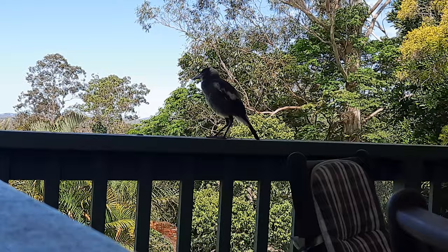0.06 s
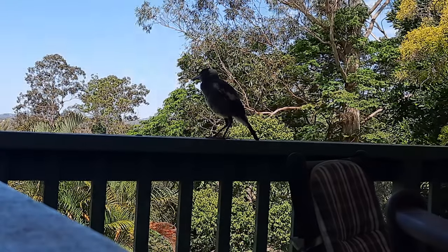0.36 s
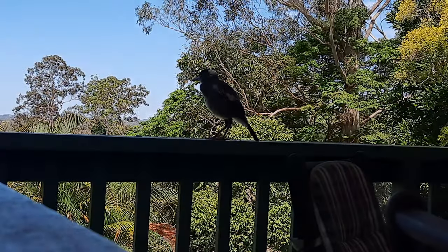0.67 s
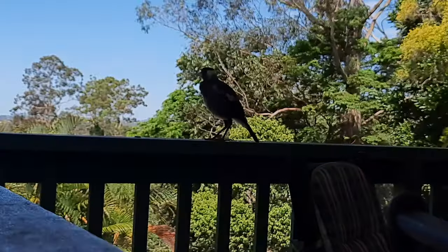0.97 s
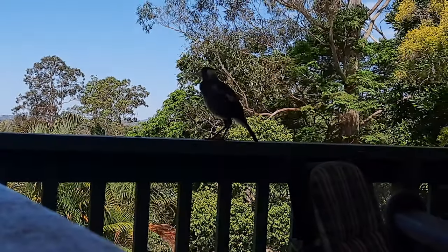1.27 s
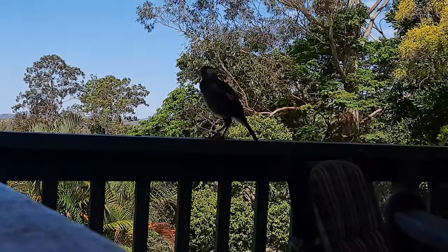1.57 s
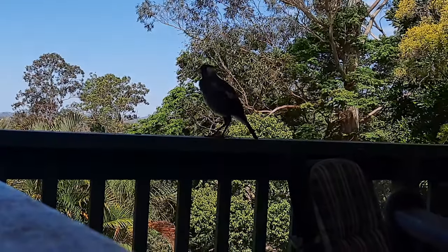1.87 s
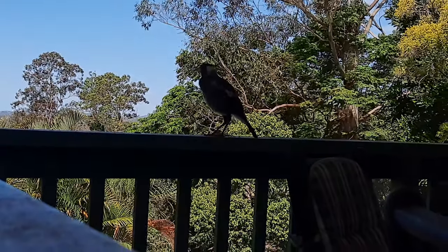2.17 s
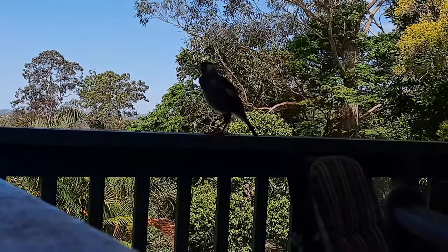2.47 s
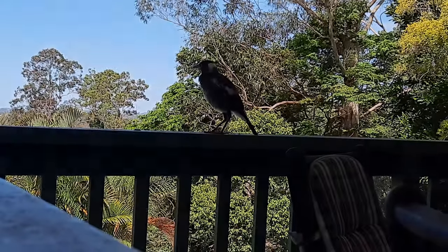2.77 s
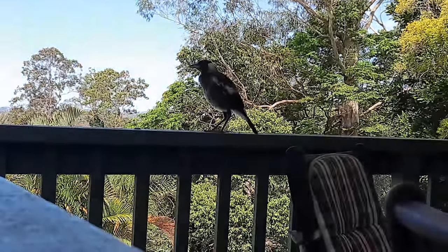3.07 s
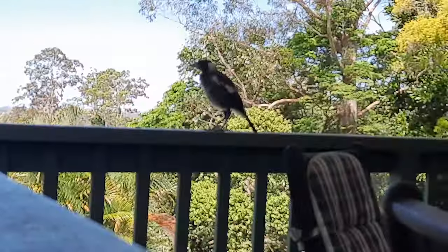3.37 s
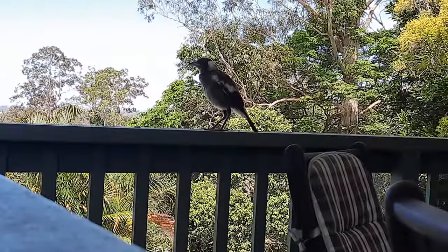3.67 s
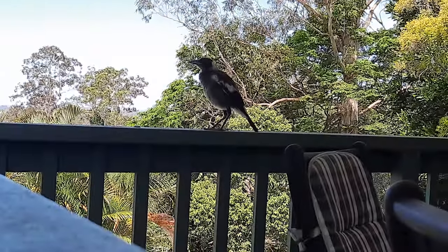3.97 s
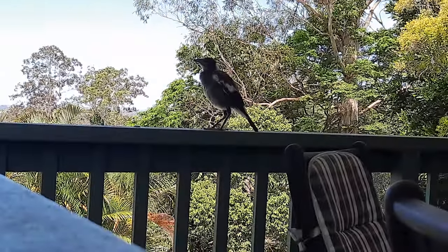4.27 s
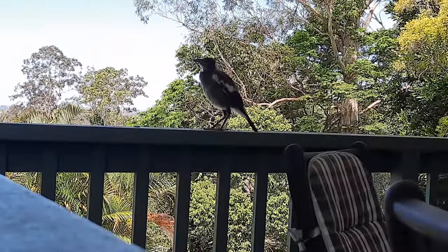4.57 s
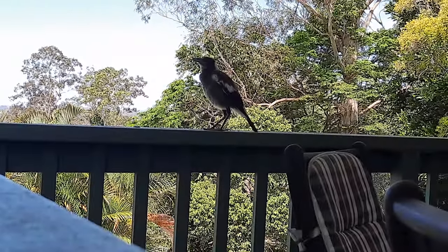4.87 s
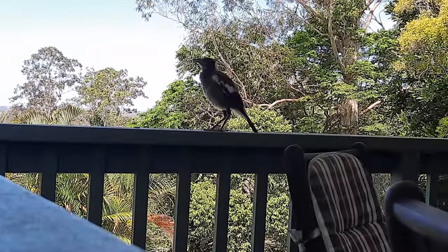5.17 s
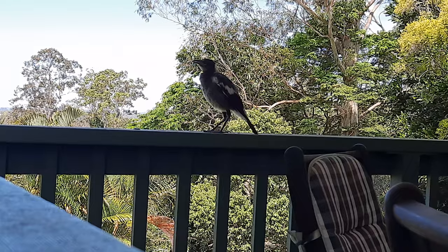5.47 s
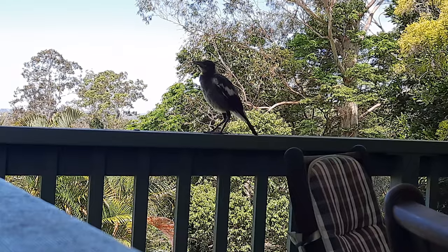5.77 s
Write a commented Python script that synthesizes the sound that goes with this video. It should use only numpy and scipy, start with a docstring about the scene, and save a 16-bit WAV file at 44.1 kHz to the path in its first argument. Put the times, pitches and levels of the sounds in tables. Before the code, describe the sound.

A young magpie warbles softly nearby in short, irregular phrases, over steadily shrilling cicadas and a hum of distant traffic.

```python
"""A suburban verandah. On the rail a young magpie warbles softly: its syrinx membranes give gliding,
often rough whistles and low throbs, then slap shut in a closing rasp. Deck, wall and roof reflect it.
Cicadas shrill in the trees, a smaller bird pipes further off, faint whistles echo from deep in the foliage.
A light breeze puffs at the left microphone port over the hum of distant traffic."""
import sys
import numpy as np
from scipy import signal
from scipy.fft import rfft, irfft
from scipy.io import wavfile

SR = 44100
rng = np.random.default_rng(int(sys.argv[2]) if len(sys.argv) > 2 else 0)


def to_wav(s):
    """Save 16-bit WAV."""
    ch = np.atleast_2d(s).T  # columns
    pcm = np.round(np.clip(ch, -1, 1) * 32767)  # PCM
    wavfile.write(sys.argv[1], SR, pcm.astype(np.int16))


N = 265041
T = np.arange(N) / SR

SMOOTH, CLEAR, HUSKY, HOARSE = .04, .13, .42, .85  # roughness 0-1: unsteadiness of the membranes
PURE = -29.5  # octave overtone/dB of a note sung without pressure


def undb(db):
    """Decibels to gain."""
    return 10 ** (np.asarray(db) / 20)


def unit(x):
    """Scale to rms 1."""
    return x / np.sqrt(np.mean(x ** 2))


def over_time(rows):
    """Interpolate each column over time."""
    times_s, *columns = np.transpose(rows)
    return [np.interp(T, np.sort(times_s), c) for c in columns]


def over_frequency(rows):
    """Interpolate each column over log frequency."""
    hz, *columns = np.transpose(rows)
    bins_hz = np.maximum(np.fft.rfftfreq(N, 1 / SR), 1)
    return [np.interp(np.log(bins_hz), np.log(hz), c) for c in columns]


def gate(from_s, to_s, fade_s):
    """Unity over the span, fading outside it."""
    edge = np.clip(np.minimum(T - from_s, to_s - T) / fade_s + 1, 0, 1)
    return np.sin(np.pi / 2 * edge) ** 2


def wander(rate_hz):
    """Smooth random signal, rms 1, rolling off at rate_hz."""
    lowpass = np.exp(-(np.fft.rfftfreq(N, 1 / SR) / rate_hz) ** 2)
    return unit(irfft(rfft(rng.standard_normal(N)) * lowpass, N))


def band(x, lo_hz, hi_hz, order=2):
    """Butterworth band-pass."""
    return signal.sosfilt(signal.butter(order, [lo_hz, hi_hz], "band", fs=SR, output="sos"), x)


def colour(x, spectrum):
    """Filter by rows of f/Hz, gain/dB; flat beyond the ends."""
    response = np.fft.fftshift(irfft(undb(over_frequency(spectrum)[0]), N))
    return signal.fftconvolve(x, response, mode="same")


def phase_rad(hz):
    """Oscillator phase along a pitch curve."""
    return 2 * np.pi * np.cumsum(hz) / SR


def pan(x, left_db):
    """Stereo, left_db louder on the left."""
    return x * undb(np.array([[left_db], [-left_db]]) / 2)


def reverb(x, t60_s, gap_s):
    """Diffuse tail of unit energy, independent per channel."""
    t = T[:SR]
    tail = rng.standard_normal((2, SR)) * np.exp(-np.log(1000) * t / t60_s) * (t > gap_s)
    tail /= np.sqrt(np.sum(tail ** 2, axis=1, keepdims=True))
    return signal.fftconvolve(x[None], tail, axes=1)[:, :N]


def surround(spectrum):
    """Noise from all around at the two microphone ports; mid rms 1."""
    # port pair: f/Hz, coherence 0-1, left minus right/dB
    ports = [(61, 1, 8.5), (152, 0.84, -1), (390, 0.5, 7.5), (700, 0.43, 4), (1401, 0, 1), (2260, 0.2, 4.5),
             (4610, 0, -.5), (7980, 0.12, -4), (10080, 0, 12), (12800, 0, 1.5)]
    coherence, left_db = over_frequency(ports)
    sign = np.array([[1], [-1]])
    mid, side = rfft(rng.standard_normal((2, N)))
    pair = np.sqrt(1 + coherence) * mid + sign * np.sqrt(1 - coherence) * side
    noise = irfft(pair * undb(over_frequency(spectrum)[0] + sign * left_db / 2), N)
    return noise / np.std(noise.mean(axis=0))


def whistles(notes, attack_s, release_s):
    """Syrinx notes bend through three pitches and swell midway; roughness shakes pitch and level."""
    swell_db = 3.5
    jitter, flutter_db, gravel = .055, 4.2, .45  # rms at roughness 1
    shake, flutter, grit = wander(202), wander(195), wander(630)
    voice = np.zeros(N)
    for start_s, length_s, open_hz, mid_hz, close_hz, db, rough, octave_db in notes:
        span = slice(max(0, int((start_s - attack_s) * SR)), int((start_s + length_s + release_s) * SR))
        t = T[span] - start_s
        along = np.clip(2 * t / length_s - 1, -1, 1)
        hz = mid_hz + (close_hz - open_hz) / 2 * along + ((open_hz + close_hz) / 2 - mid_hz) * along ** 2
        phase = phase_rad(hz * (1 + jitter * rough * shake[span]))
        tone = np.sin(phase) + undb(octave_db) * np.sin(2 * phase)
        tone *= 1 + gravel * rough * grit[span]
        edge = np.clip(np.minimum(t / attack_s, (length_s - t) / release_s) + .5, 0, 1)
        level_db = db - swell_db * along ** 2 + flutter_db * rough * flutter[span]
        voice[span] += np.sqrt(2) * np.sin(np.pi / 2 * edge) ** 2 * undb(level_db) * tone
    return voice


def buzz(contour, jitter, lo_hz, hi_hz, harmonics):
    """The membranes slap shut once a cycle; the throat passes one band of overtones."""
    hz, db = over_time(contour)
    phase = phase_rad(hz * (1 + jitter * wander(249)))
    pulses = sum(np.cos(k * phase) for k in range(1, harmonics + 1))
    envelope = undb(db) * gate(contour[0][0], contour[-1][0], fade_s=.008)
    return envelope * unit(band(pulses, lo_hz, hi_hz))


def magpie():
    """Gliding whistles and low throbs, both shaped by the throat."""
    # warble; at overlaps both sides of the syrinx sound:
    # t/s, length/s, opening f/Hz, middle f/Hz, closing f/Hz, relative level/dB, roughness 0-1, octave/dB
    notes = [ (0, 0.031, 1248, 1081, 1050, -32.5, HUSKY, PURE),
             (.005, 0.089, 1268, 1405, 1077, -39, HOARSE, PURE),
             (.085, .07, 1122, 1079, 1040, -45, HUSKY, PURE),
             (.228, 0.024, 1660, 1560, 1420, -47, HUSKY, PURE),
             (.25, 0.032, 1387, 1292, 1160, -36.5, HUSKY, PURE),
             (.295, 0.038, 902, 862, 775, -47, HUSKY, PURE),
             (.405, 0.019, 1316, 1310, 1330, -46, CLEAR, PURE),
             (1.038, 0.072, 1192, 1345, 1350, -41.5, CLEAR, PURE),
             (1.11, 0.022, 1310, 1379, 1346, -31.5, CLEAR, -18),
             (1.138, 0.038, 1630, 1570, 1270, -40.5, HUSKY, PURE),
             (1.225, .05, 1230, 1348, 1396, -31, CLEAR, PURE),
             (1.248, 0.033, 1626, 1548, 1580, -38.5, HUSKY, PURE),
             (1.277, 0.045, 1210, 1254, 1010, -33.5, CLEAR, PURE),
             (1.323, 0.021, 1372, 1365, 1230, -28, CLEAR, PURE),
             (1.342, 0.022, 1200, 1090, 1096, -26, CLEAR, PURE),
             (1.37, .075, 1178, 1137, 1188, -33.5, CLEAR, PURE),
             (1.445, 0.055, 1238, 1353, 1236, -42, HOARSE, PURE),
             (1.448, 0.025, 1560, 1605, 1690, -35, CLEAR, PURE),
             (1.725, 0.067, 1143, 1633, 1320, -46.5, HOARSE, -18),
             (1.815, 0.042, 1296, 1474, 1680, -38, HUSKY, PURE),
             (1.853, 0.042, 1575, 1676, 1020, -34, HUSKY, PURE),
             (1.895, 0.052, 972, 1039, 1076, -40, HOARSE, PURE),
             (1.945, 0.03, 1300, 1534, 1560, -42, HOARSE, PURE),
             (1.99, 0.031, 1090, 1133, 1035, -39, HOARSE, -15),
             (2.0, 0.068, 1378, 1290, 1130, -49.5, HOARSE, PURE),
             (2.035, 0.07, 863, 828, 780, -42, HOARSE, PURE),
             (2.362, 0.032, 1473, 1276, 880, -45, HOARSE, PURE),
             (2.642, 0.038, 1396, 1283, 1250, -44, HOARSE, PURE),
             (2.785, 0.211, 931.5, 1020, 988, -45.5, HUSKY, PURE),
             (3.283, 0.068, 889, 945, 1044, -44, HUSKY, PURE),
             (3.378, 0.0513, 1105, 1087, 990, -40.5, CLEAR, -8),
             (3.437, 0.025, 1370, 1294, 1200, -41, HUSKY, PURE),
             (3.598, 0.027, 1453, 1074, 1040, -38, HUSKY, PURE),
             (3.62, .115, 758.5, 818, 789, -45, HOARSE, PURE),
             (3.66, 0.057, 1057, 1040, 980, -48.5, HOARSE, PURE),
             (4.615, 0.051, 1272, 1132, 1074, -44.5, HUSKY, -6.5),
             (4.807, 0.02, 1197, 1250, 1230, -45, HOARSE, PURE),
             (4.845, .055, 1334, 1192, 1370, -37, HUSKY, PURE),
             (4.903, .033, 1342, 1288, 1144, -33, HUSKY, PURE),
             (4.935, .145, 1203, 1064, 931, -43.5, HOARSE, PURE),
             (5.198, 0.044, 1421, 1352, 1300, -37, CLEAR, PURE),
             (5.24, 0.028, 1360, 1346, 1280, -30, CLEAR, PURE),
             (5.272, .036, 1230, 1172, 1020, -41, HUSKY, PURE),
             (5.399, 0.011, 1117, 1305, 1440, -33, HUSKY, PURE),
             (5.405, 0.043, 1540, 1573, 1696, -29.5, CLEAR, PURE),
             (5.444, 0.073, 1792, 1814, 1700, -44.5, HOARSE, PURE),
             (5.522, 0.023, 1395, 1263, 1170, -42.5, HUSKY, -4.5),
             (5.591, 0.033, 1430, 1301, 1340, -37.5, CLEAR, PURE),
             (5.627, 0.042, 1406, 1358, 1247, -31.5, CLEAR, PURE),
             (5.668, 0.057, 1187, 891, 843, -44.5, HOARSE, PURE),
             (5.745, 0.019, 1520, 1640, 1140, -37.5, HUSKY, PURE),
             (5.776, 0.048, 1016, 1052, 1034, -34.5, SMOOTH, -9.5),
             (5.848, 0.072, 1142, 1042, 980, -43, HUSKY, PURE),
             (5.925, 0.06, 855, 848, 815, -38.5, HUSKY, -9), ]
    # short voice pulses, single or in rolls: t/s, relative level/dB
    throbs = [(0.386, -34), (1.518, -40.5), (1.564, -42), (1.783, -30), (1.805, -34), (2.062, -36),
              (2.099, -31), (2.386, -37.5), (2.446, -40), (2.643, -30), (2.675, -41), (2.784, -34.5),
              (2.806, -38), (2.833, -27.5), (2.894, -27), (2.94, -30), (2.97, -27.5), (3.337, -38),
              (3.684, -34), (4.796, -30), (4.844, -31.5), (4.934, -26), (4.967, -31.5), (5.002, -34),
              (5.05, -31.5), (5.302, -39.5)]
    # throat and nearly closed beak: f/Hz, gain/dB
    throat = [(500, -5.5), (740, 4), (810, -1.5), (875, 1), (960, -1.5), (1050, -1.5), (1370, -0.5),
              (1480, -3), (1620, -2), (2150, 2), (2500, -3), (3200, -4)]
    throb_s, top_hz, low_hz = .015, 884.3, 822.7  # pitch arch at the lowest throat resonance
    arches = [(s, throb_s, low_hz, top_hz, low_hz, db - 3, HUSKY, PURE) for s, db in throbs]
    warble = whistles(notes, attack_s=.011, release_s=.01)
    throbbing = whistles(arches, attack_s=.028, release_s=.01)
    return undb(-.39) * colour(warble + throbbing, throat)


def nasal_note():
    """The magpie's thin opening buzz: high overtones of the membrane pulses."""
    # contour: t/s, f/Hz, relative level/dB
    contour = [(0, 932, -51), (.04, 965, -52), (.08, 974, -53), (.11, 920, -53), (.15, 900, -70)]
    return undb(-.5) * buzz(contour, jitter=.021, lo_hz=2600, hi_hz=4200, harmonics=7)


def verandah(x):
    """Direct sound, hard reflections, a short ring under the roof and a faint one from the garden."""
    # deck, wall and roof reflections: delay/s, left gain, right gain
    echoes = [(.004, 0.11, 0.1), (0.0126, 0.32, .05), (0.0158, .05, 0.22), (0.0211, 0.079, 0.11),
              (0.032, 0.075, 0.15)]
    early = sum(np.array([[left], [right]]) * np.interp(T - delay_s, T, x, left=0)
                for delay_s, left, right in echoes)
    roof = undb(-2.5) * reverb(x, t60_s=.25, gap_s=.005)
    garden = undb(-23) * reverb(x, t60_s=1.0, gap_s=.087)
    wet = early + roof + garden
    mid = wet.mean(axis=0)
    alike_hz = 1230  # below this the reflections narrow towards mono
    side_db = over_frequency([(alike_hz / 2, -20), (alike_hz, 0)])[0]
    side = irfft(rfft(wet - mid) * undb(side_db), N)
    return undb(-1.63) * pan(x + mid + side, left_db=4)


def cicadas():
    """Many insects merge into one shrill band that grows steadily and shimmers."""
    # chorus spectrum: f/Hz, relative density/dB
    chorus = [(5500, -29.5), (6700, -22.5), (7050, -16), (7350, -9.5), (7900, -1.5), (8350, 1.5),
              (8700, -2.2), (9050, -5.5), (9450, -8), (9750, -14.5), (10200, -21.5), (11000, -28.5),
              (14000, -51)]
    start_db, rise_db_per_s, shimmer_db = -46, 1.0, .39
    return surround(chorus) * undb(start_db + rise_db_per_s * T + shimmer_db * wander(90))


def suburb():
    """Distant traffic with a low drone, slowly growing, and a soft hiss from the trees."""
    # traffic spectrum: f/Hz, relative density/dB
    traffic = [(18, -53), (30, -14.5), (85, -2.5), (173, -3.5), (220, -10.5), (290, -1.5), (406, -1.5),
               (588, 0.5), (690, -3.5), (824, -1), (983, -5.5), (1100, -3.5), (1400, -23), (1820, -68),
               (3080, -120)]
    # leaves and far insects: f/Hz, relative density/dB
    leaves = [(600, -62), (1300, -1.5), (1900, -1), (2450, -1), (2900, -4), (3500, -8), (4300, -2.5),
              (5400, -7), (6500, -5), (9000, -13), (12500, -6.5), (14500, -14.5), (17000, -74)]
    start_db, rise_db_per_s = -54.5, .64
    hum = surround(traffic) * undb(.5 * wander(8.6))
    drone = undb(-10.5) * unit(band(rng.standard_normal(N), 283, 340.4))
    hiss = surround(leaves) * undb(-55.5 + .5 * wander(7.6))
    return (hum + pan(drone, left_db=-3)) * undb(start_db + rise_db_per_s * T) + hiss


def tree_bird():
    """A scratchy squeak clears into piping with a strong octave, scattered by foliage."""
    # call: t/s, length/s, opening f/Hz, middle f/Hz, closing f/Hz,
    # relative level/dB, roughness 0-1, octave/dB
    piping = [ (.584, 0.017, 2610, 2580, 2600, -47.5, HUSKY, -5),
              (.615, 0.039, 2310, 2356, 2390, -44, HUSKY, -7),
              (.654, 0.036, 1880, 2000, 2090, -44.5, HOARSE, -1),
              (.671, 0.031, 2640, 2622, 2630, -40.5, HUSKY, -6),
              (.712, 0.048, 2433, 2437, 2475, -40.5, SMOOTH, 2.5),
              (.756, 0.056, 2464, 2451, 2437, -33.5, SMOOTH, -15),
              (.826, 0.017, 2300, 2345, 2390, -41, SMOOTH, -31),
              (.858, 0.036, 2390, 2400, 2450, -49.5, SMOOTH, -17), ]
    call = whistles(piping, attack_s=.008, release_s=.026)
    right_lag_s = .00023  # the bird sits to the left
    direct = np.array([call, np.interp(T - right_lag_s, T, call)])
    scattered = reverb(call, t60_s=.13, gap_s=.0073)
    return pan(undb(-3.5) * direct + undb(-1) * scattered, left_db=1.5)


def far_whistles():
    """Wavering whistles so deep in the trees that only their echo arrives."""
    # whistles: t/s, length/s, f/Hz, relative level/dB
    notes = [(0.954, 0.51, 2396, -60.5), (1.506, 0.26, 2540, -60.5), (3.202, 0.49, 2380, -63)]
    waver = 1 + .045 * wander(60)
    calls = sum(undb(db) * gate(s, s + length_s, fade_s=.046) * np.sin(phase_rad(hz * waver))
                for s, length_s, hz, db in notes)
    return undb(7) * reverb(calls, t60_s=.34, gap_s=.03)


def breeze():
    """Eddies rumble at each port independently, most at the windward left: puffs, then a gusty spell."""
    # wind puffs: t/s, length/s, relative level/dB
    puffs = [(2.119, 0.12, -53), (3.18, .07, -49), (3.438, .057, -48.5), (3.623, .08, -46),
             (3.664, 0.08, -46), (3.75, .08, -51.5), (4.413, .11, -44), (4.563, .044, -47)]
    spell_db, gust_db, lee_db = -48.5, 4, -8.5
    eddies = band(rng.standard_normal((2, N)), 57, 76.6, order=1)
    eddies = unit(band(eddies, 33, 280, order=3))
    puffing = sum(undb(db + 4) * np.exp(-(2 * (T - s) / length_s) ** 2) for s, length_s, db in puffs)
    spell = gate(from_s=4.7, to_s=5.7, fade_s=.13) * undb(spell_db + gust_db * wander(11))
    return (puffing + spell) * undb([[0], [lee_db]]) * eddies


def rasp():
    """The magpie's closing rasp: slow, uneven membrane pulses."""
    # contour: t/s, pulse rate/Hz, level/dB
    contour = [(5.885, 284.4, -57), (5.925, 273, -56), (5.942, 269, -37.5), (5.97, 273.5, -43.5),
               (6.01, 295, -48)]
    return buzz(contour, jitter=.0343, lo_hz=1340, hi_hz=1960, harmonics=11)


def scene():
    """The magpie close by, the garden behind it."""
    near = verandah(rasp() + nasal_note() + magpie())
    return near + tree_bird() + far_whistles() + cicadas() + suburb() + breeze()


def record(dry):
    """The recorder's steep low-pass cuts the top."""
    top_hz = 14800
    return signal.sosfilt(signal.ellip(10, .1, 80, top_hz, fs=SR, output="sos"), dry)


dry = scene()
out = record(dry)
to_wav(out)
```